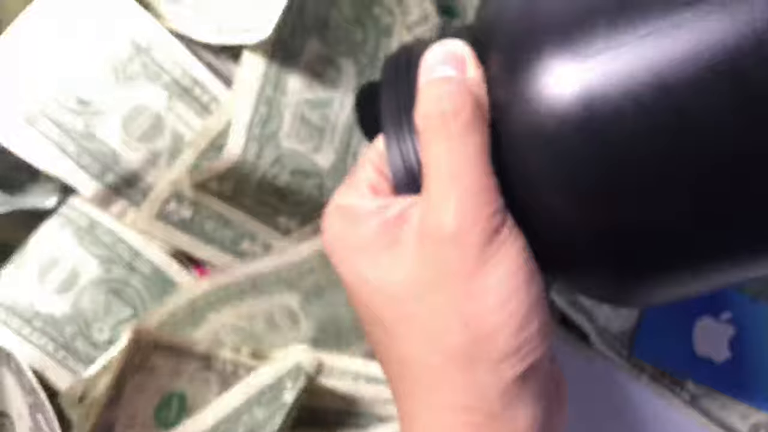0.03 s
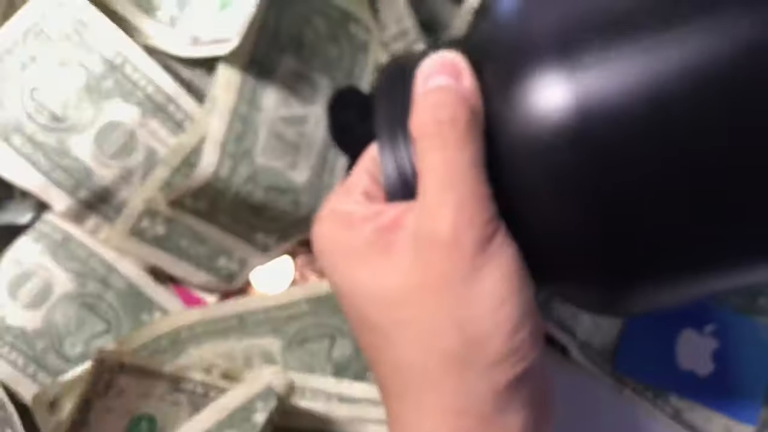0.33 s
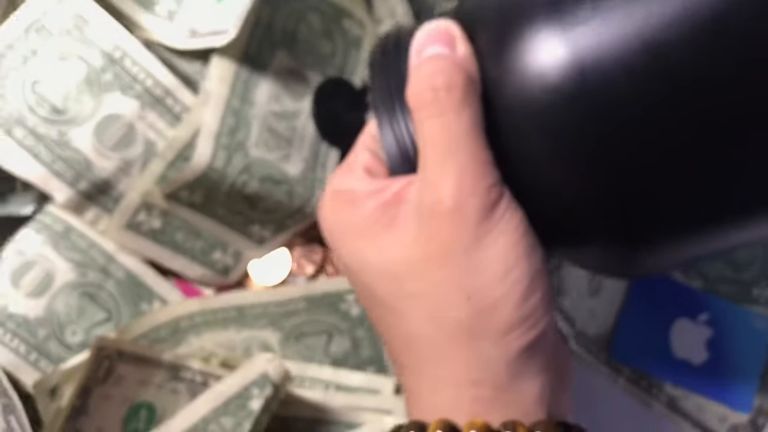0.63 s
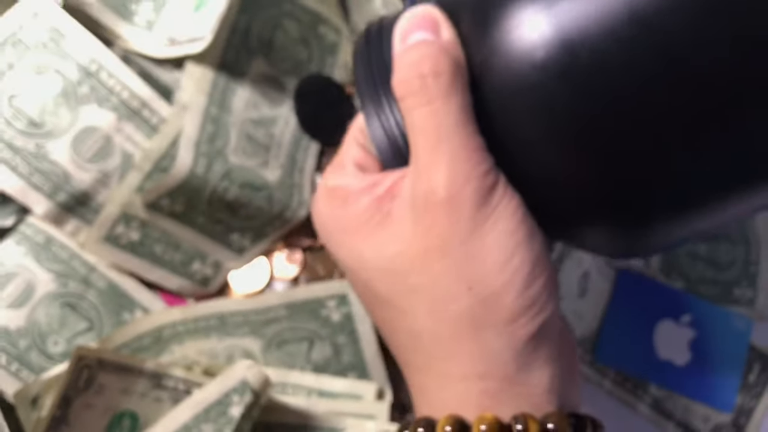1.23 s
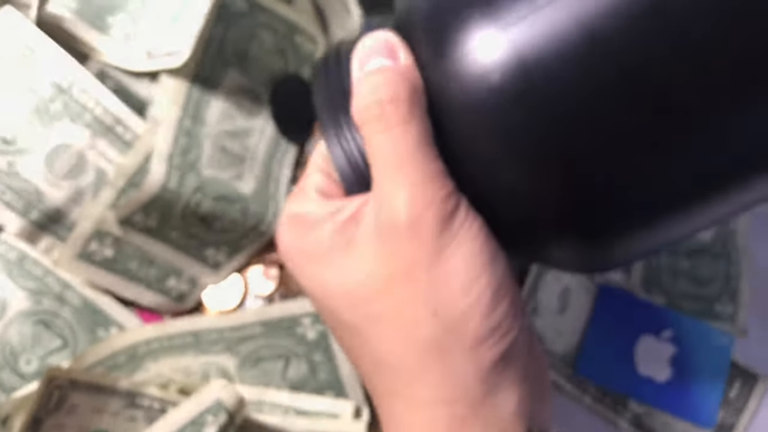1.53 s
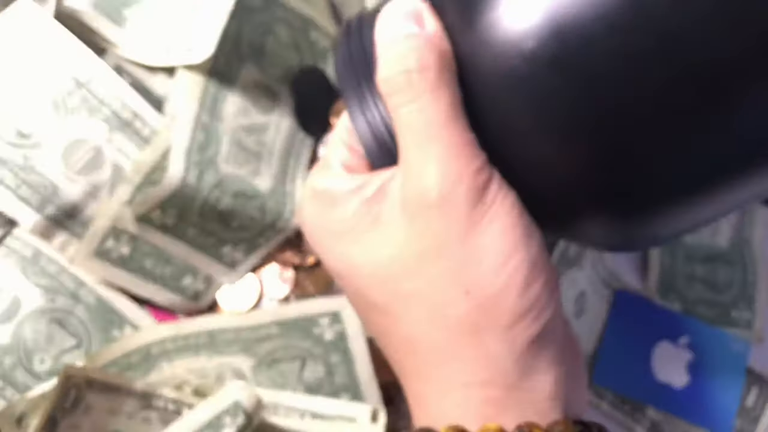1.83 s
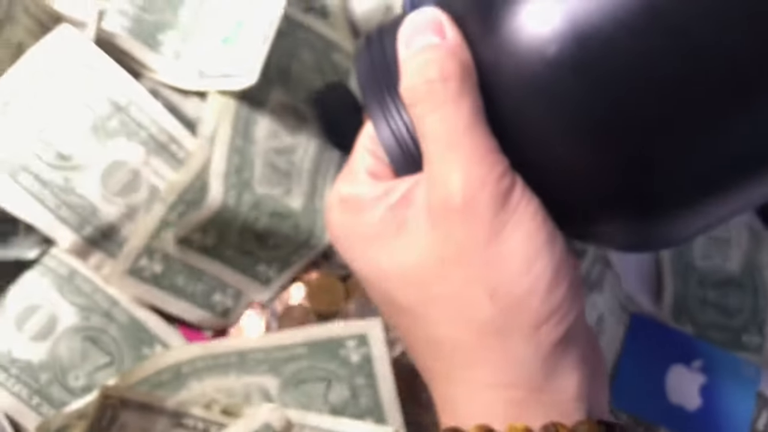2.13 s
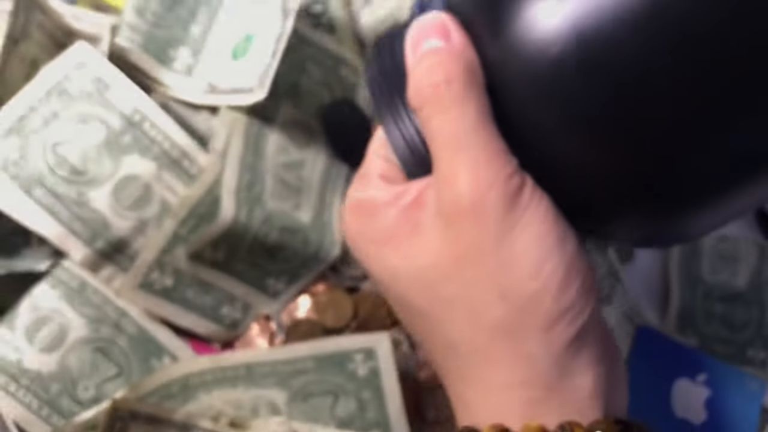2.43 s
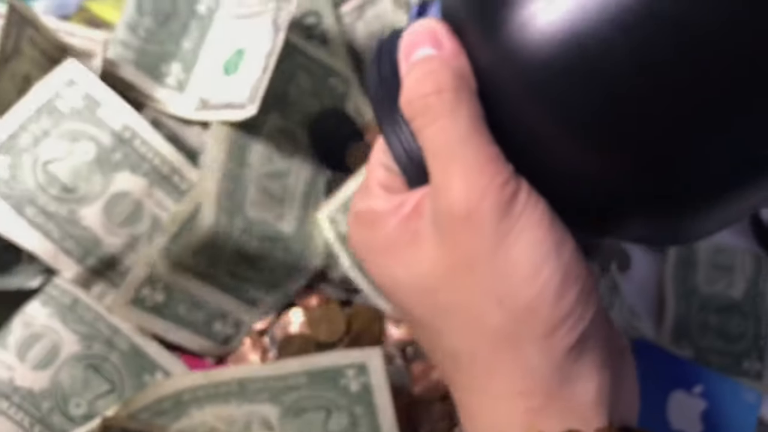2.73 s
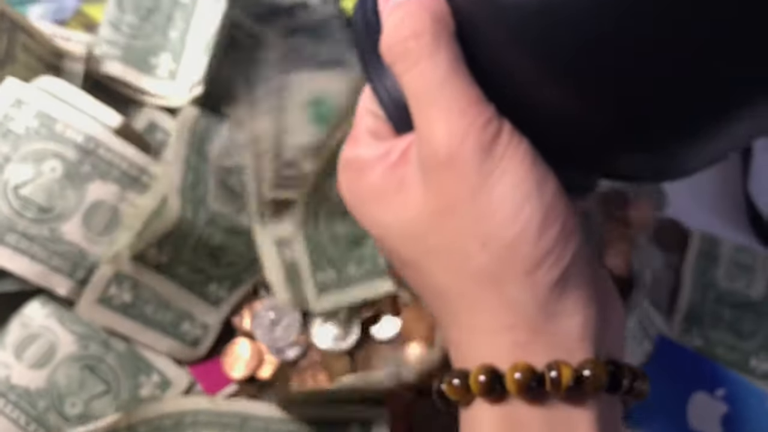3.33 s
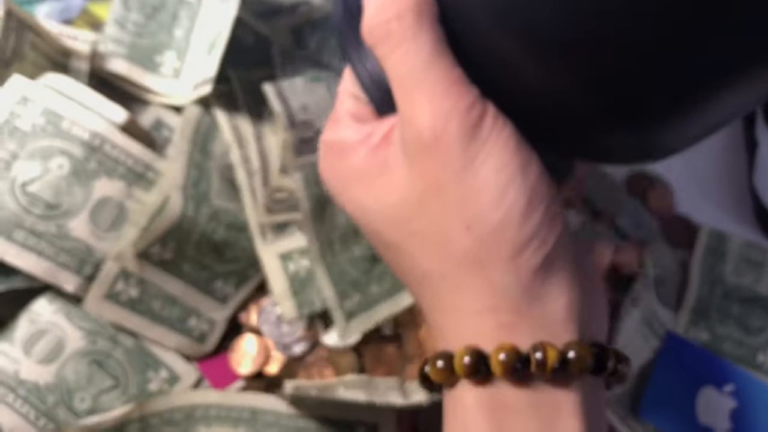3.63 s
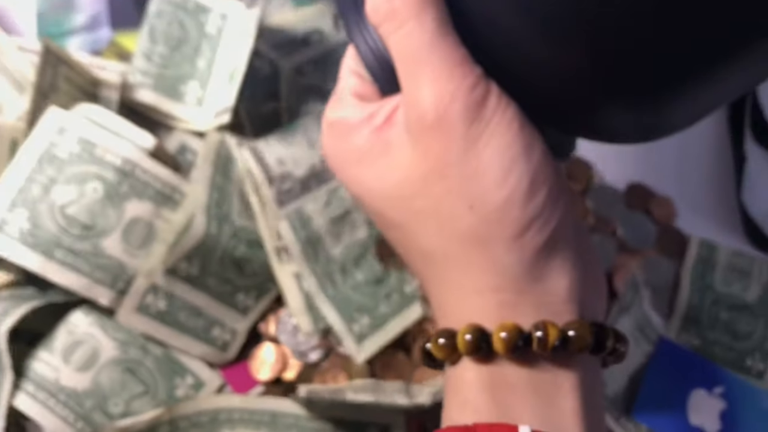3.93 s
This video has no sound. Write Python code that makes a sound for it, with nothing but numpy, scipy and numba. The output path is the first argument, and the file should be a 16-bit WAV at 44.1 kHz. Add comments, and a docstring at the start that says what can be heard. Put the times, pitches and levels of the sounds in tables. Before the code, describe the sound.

Coins pour from a plastic tub onto a heap of coins and bills, jingling and rattling.

```python
"""A hollow boom and a dense bright jingle, close up: coins slide out of a tilted plastic tub onto a heap
of coins and paper bills. Coin strikes coin, ticking and ringing; the shifting load booms in the tub's
hollow and rattles along its wall. Clumps land with dull thuds, hard knocks and clinks stand out, and a few
coins fall clear and sing. A small room adds a short tail and the loudest peaks overload the recorder."""
import sys
import numpy as np
from scipy import signal
from scipy.fft import rfft, irfft
from scipy.io import wavfile
from numba import njit

SR = 44100
rng = np.random.default_rng(int(sys.argv[2]) if len(sys.argv) > 2 else 0)


def write(x):
    x = np.atleast_2d(x).T
    wavfile.write(sys.argv[1], SR, np.round(np.clip(x, -1, 1) * 32767).astype(np.int16))


N = 176400

# Table levels are relative: each layer applies its own trim.
# swell of the tub's hollow boom (time [s], level [dB])
BOOM_ENVELOPE = [(0, -9.5), (.05, -38), (.09, -39), (.14, -27), (.22, -46), (.3, -42), (.5, -32),
                 (.58, -29), (.8, -24.5), (.9, -28), (1.05, -32), (1.24, -22.5), (1.33, -30), (1.5, -27),
                 (1.65, -33.5), (2, -37), (2.1, -42), (2.33, -40), (2.45, -26), (2.58, -26.5),
                 (2.67, -22.5), (2.95, -27.5), (3.2, -24), (3.3, -35), (3.42, -30), (3.5, -44), (3.68, -24),
                 (3.8, -35.5), (4, -37)]
# low modes of the tub (pitch [Hz], level [dB], t60 [s])
HOLLOW_MODES = [(164.3, -2.5, 0.063), (201.6, 2.5, 0.13), (265, -4.5, 0.088), (309, -4, 0.038),
                (423, -15, 0.095)]
# tone of the heap's rumble (frequency [Hz], level [dB])
RUMBLE_EQ = [(20, -9), (60, -6), (120, 1), (250, -2), (600, -22)]
# flow of coins striking each other (time [s], level [dB])
JINGLE_ENVELOPE = [(0.0, -14.5), (0.24, -20), (0.29, -37), (0.32, -25), (0.4, -36.5), (0.52, -20.5),
                   (0.83, -13), (0.87, -10), (0.95, -11.5), (1.15, -14), (1.2, -8.5), (1.35, -13.5),
                   (1.4, -9), (1.46, -19), (1.48, -14), (1.5, -16), (1.64, -20.5), (1.68, -14),
                   (1.73, -14.5), (1.93, -10), (2.17, -17), (2.19, -21.5), (2.33, -23.5), (2.35, -9.5),
                   (2.41, -22.5), (2.65, -6.5), (3.03, -4.5), (3.1, -10.5), (3.21, -5), (3.41, -10.5),
                   (3.52, -20), (3.53, -15.5), (3.55, -20.5), (3.82, -4.5), (3.85, -24), (3.88, -16),
                   (3.92, -24), (3.93, -4.5), (3.95, -24.5), (4.0, -21.5)]
# bending modes of the mixed coins (pitch [Hz], spread between coins [Hz], level [dB])
BENDING_MODES = [(9285, 207, -6.5), (12120, 750, -5), (13040, 234, 0), (14700, 550, -2.5), (15300, 233, -2)]
# tone of a metal-on-metal tick (frequency [Hz], level [dB])
TICK_EQ = [(500, -7), (2500, -20), (4500, -7), (6000, 0.5), (8000, 0), (10500, 2), (16000, 5)]
# coins tumbling along the tub wall (time [s], level [dB])
RATTLE_ENVELOPE = [(0, -24.5), (.1, -30), (.19, -22), (.24, -34), (.33, -30), (.45, -35), (.53, -30.5),
                   (.6, -24), (.64, -18.5), (.68, -24), (.76, -18.5), (.94, -23.5), (.98, -21),
                   (1.1, -21.5), (1.17, -19), (1.4, -20.5), (1.45, -25), (1.54, -21), (1.63, -20.5),
                   (1.7, -17), (1.82, -23.5), (1.95, -33), (1.98, -21), (2.06, -24), (2.12, -28),
                   (2.18, -31), (2.25, -24), (2.31, -25.5), (2.35, -33.5), (2.42, -27.5), (2.48, -15.5),
                   (2.6, -20), (2.65, -15), (2.95, -17), (3.05, -16), (3.28, -17.5), (3.47, -26.5),
                   (3.56, -23), (3.67, -14.5), (3.76, -16.5), (3.84, -27), (3.95, -26.5), (4, -38)]
# resonances of the tub wall (pitch [Hz], width [Hz], level [dB])
PLASTIC_MODES = [(604, 26, 0.5), (1055, 130, -8), (1530, 220, -4), (1886, 170, -9), (2404, 150, -6),
                 (2970, 120, -5), (3350, 240, -3), (4080, 270, -7)]
# tone of the struck wall (frequency [Hz], level [dB])
WALL_EQ = [(100, -39), (300, -1), (480, -15.5), (700, -3.5), (1100, -2.5), (1550, -4.5), (2100, -3),
           (3300, -4), (4200, -6.5), (5000, -6.5), (7500, -9.5), (16000, -26.5)]
# clumps of coins landing (time [s], level [dB], slap offset [dB])
THUD_CUES = [(0.014, -22, -14), (.138, -10.5, -13), (.15, -16, -19), (.639, -12, -2), (.777, -25, -7),
             (.98, -9, -7.5), (1.096, -14, 2), (1.216, -14, -12), (1.482, -20, -6), (1.714, -13, 3),
             (1.988, -14, -3), (2.235, -17, 0), (2.292, -17, 0), (2.355, -22, -12), (2.43, -16, -6),
             (2.649, 0.5, 1), (2.775, -2, 2.5), (2.883, -0.5, 1), (2.998, -6, -5), (3.09, -7, -9),
             (3.184, -5, 7), (3.254, -11, 3), (3.395, -8, 1.5), (3.659, -20, -4), (3.875, -14, -2),
             (3.961, -10, 4.5)]
# tone of a clump's slap (frequency [Hz], level [dB])
SLAP_EQ = [(60, -32), (150, -15), (450, -12), (750, -5), (1100, 0), (1700, -8), (4000, -22)]
# single hard knocks on the wall (time [s], level [dB], clack pitch [Hz])
KNOCK_CUES = [(0.143, -8, 3780), (0.163, -0.5, 2130), (0.174, -9, 2140), (0.192, -10, 1830),
              (0.212, -12, 2160), (0.285, -13, 1660), (0.333, -13, 1610), (0.366, -13.5, 3090),
              (0.39, -15, 3000), (0.422, -15, 1480), (0.476, -17.5, 3200), (0.548, -13.5, 1430),
              (0.624, 2.5, 3300), (0.644, -4, 3230), (0.69, -3.5, 2480), (0.717, -7.5, 2220),
              (0.737, -11, 2390), (1.06, -10.5, 1540), (1.222, -4.5, 1520), (1.255, -6.5, 1460),
              (1.378, -4.5, 1490), (1.401, -1.5, 1570), (1.526, -0.5, 3570), (1.582, -4, 1440),
              (1.69, 0, 1600), (1.699, -3, 1420), (1.787, -3.5, 4050), (1.981, -4.5, 2960),
              (2.022, -6.5, 2940), (2.234, -3, 1520), (2.291, 2.5, 2410), (2.379, -8, 2260),
              (2.395, -4, 1800), (2.428, -7, 2370), (2.457, -3.5, 2900), (2.463, -2, 3930),
              (2.501, 1.5, 2250), (2.622, -5, 2410), (2.63, -0.5, 2040), (2.644, -2, 1450),
              (2.691, -5, 2400), (2.772, -1, 1660), (2.995, -3, 1760), (3.185, -2.5, 1950),
              (3.502, -6.5, 1570), (3.583, -3, 1550), (3.662, -2.5, 2960), (3.686, -10.5, 2400),
              (3.694, -6, 2520), (3.715, -6, 3820), (3.865, -7, 1650), (3.889, -12.5, 2480),
              (3.928, -8.5, 3190)]
# hard coin-on-coin strikes (time [s], level [dB])
CLINK_CUES = [(.1635, -21), (.2453, -11), (.3125, -11), (.423, -13), (.5574, -8), (.6234, -2), (.8605, 1),
              (.8913, -1), (1.1942, -3), (1.398, -3), (1.479, 4), (1.6676, -9), (2.075, -4), (2.1594, -5),
              (2.2333, -2.5), (2.2987, -2), (2.3267, -6), (2.3441, -9), (2.36, -8), (2.4557, -3),
              (2.5453, -10), (3.34, -6), (3.528, -4), (3.6257, -1), (3.7894, -1), (3.8133, -2),
              (3.867, -13), (3.879, -6), (3.932, 3)]
# coins that fall clear and ring freely (time [s], level [dB], pitch [Hz], t60 [s])
FREE_COIN_CUES = [(1.479, -8, 15400, .12), (1.55, -18, 11600, .1), (1.668, -11, 15200, .1),
                  (1.92, -18, 11560, .18), (2.075, -13, 9200, .1), (2.235, -16, 11600, .1),
                  (2.298, -13, 14680, .26), (2.33, -9, 12170, .22), (2.368, -17, 9540, .3),
                  (2.842, -13, 5160, .06), (2.933, -10, 5220, .09), (3.035, -11, 5200, .08),
                  (3.04, -13, 4060, .08), (3.68, -8, 14930, .25), (3.72, -11, 14930, .25),
                  (3.79, -5, 14930, .13), (3.82, -4, 14930, .07), (3.868, -8, 12700, .1),
                  (3.895, -10, 12780, .08)]

CLACK_T60_S = 0.038


def amp(db):
    """Decibels to gain."""
    return 10 ** (np.asarray(db) / 20)


def unit(x):
    """Scale to rms 1."""
    return x / np.sqrt(np.mean(x ** 2))


def fader(rows):
    """Gain at every sample from rows of (time [s], level [dB])."""
    return amp(np.interp(np.arange(N) / SR, *np.array(rows).T))


def decay(t60):
    """Exponential fade that falls 60 dB in t60 seconds."""
    return np.exp(-np.log(1000) * np.arange(int(t60 * SR) + 2) / (t60 * SR))


def convolve(x, response):
    """Pass a sound through an impulse response."""
    return signal.fftconvolve(x, response)[:N]


def eq(x, points, size=2048):
    """Minimum-phase filter of unit power, shaped by points of (frequency [Hz], level [dB])."""
    hz, db = np.array(points).T
    bin_hz = np.arange(size // 2 + 1) * SR / size
    gain = unit(amp(np.interp(np.log(bin_hz + 1), np.log(hz), db)))
    cepstrum = irfft(np.log(gain))
    cepstrum[1:size // 2] *= 2
    cepstrum[size // 2 + 1:] = 0
    return convolve(x, irfft(np.exp(rfft(cepstrum))))


def contacts(per_s, scatter_db):
    """Irregular contact times and their strengths, which span up to four times scatter_db."""
    chance = rng.random((int(per_s * N / SR), 3))
    times = (np.arange(len(chance)) + 2 * chance[:, 0]) / per_s
    return times, amp(2 * scatter_db * (chance[:, 1] + chance[:, 2]))


def cracks(times, sizes, t60):
    """A short decaying burst of noise at each contact."""
    power = np.bincount((times * SR).astype(int), sizes ** 2, N)[:N]
    envelope = np.sqrt(np.abs(convolve(power, decay(t60) ** 2)))
    return envelope * rng.standard_normal(N)


@njit
def rings(times, hz, t60, sizes):
    """A decaying sine at each contact; hz and t60 are shared or given per contact."""
    out = np.zeros(N)
    hz, t60 = hz * np.ones(len(times)), t60 * np.ones(len(times))
    for k in range(len(times)):
        start, phasor = int(times[k] * SR), sizes[k] + 0j
        pole = np.exp((2j * np.pi * hz[k] - np.log(1000) / t60[k]) / SR)
        for i in range(max(start, 0), min(N, start + int(t60[k] * SR))):
            phasor *= pole
            out[i] += phasor.imag
    return out


def tub_ring(times, sizes, low_cut_hz=137):
    """Each push rings the tub's low modes, in alternating polarity; the deep bass below them is cut away."""
    ring = sum((-1) ** k * rings(times, hz, t60, sizes * amp(db))
               for k, (hz, db, t60) in enumerate(HOLLOW_MODES))
    return signal.sosfilt(signal.butter(3, low_cut_hz, "high", fs=SR, output="sos"), ring)


def tub_boom():
    """The shifting load keeps the hollow booming over the heap's faint rumble."""
    times, sizes = contacts(per_s=300, scatter_db=0.5)
    boom = unit(tub_ring(times, sizes * rng.standard_normal(len(times))))
    rumble = eq(rng.standard_normal(N), RUMBLE_EQ)
    return fader(BOOM_ENVELOPE) * (amp(-0.5) * boom + amp(-10.5) * rumble)


def clump_flutter(per_s=55, depth_db=1.3):
    """Coins slip in small clumps, so the flow flutters in level."""
    times = np.arange(int(per_s * N / SR) + 2) / per_s
    return unit(fader(np.c_[times, depth_db * rng.standard_normal(len(times))]))


def jingle():
    """Coin on coin: a tick, then modes that ring until the neighbours damp them."""
    times, sizes = contacts(per_s=1200, scatter_db=5)
    t60 = 0.029 * np.exp(0.55 * rng.standard_normal(len(times)))
    ring = np.zeros(N)
    for hz, spread, db in BENDING_MODES:
        detune, share = rng.standard_normal((len(times), 2)).T
        ring += rings(times, hz + spread * detune, t60, sizes * share * amp(db))
    ticks = eq(cracks(times, sizes, t60=0.022), TICK_EQ)
    return fader(JINGLE_ENVELOPE) * clump_flutter() * (amp(-2.5) * unit(ring) + amp(-6) * unit(ticks))


def plastic_wall(x):
    """The wall dulls a hit and adds its own resonances."""
    dull = eq(x, WALL_EQ)
    return dull + sum(amp(db) * signal.lfilter(*signal.iirpeak(hz, hz / width, SR), dull)
                      for hz, width, db in PLASTIC_MODES)


def wall_rattle(pitch_spread=0.07):
    """Coins tumble along the wall: a scrape, and clacks whose pitch changes from spot to spot."""
    times, sizes = contacts(per_s=260, scatter_db=3.5)
    clacks = np.zeros(N)
    for hz, width, db in PLASTIC_MODES:
        detune, share = rng.standard_normal((len(times), 2)).T
        pitch = hz * (1 + pitch_spread * detune)
        clacks += rings(times, pitch, CLACK_T60_S, sizes * share * amp(db) * np.sqrt(width))
    scrape = plastic_wall(unit(cracks(times, sizes, t60=0.035)))
    return fader(RATTLE_ENVELOPE) * (amp(-2) * scrape + amp(-3) * unit(clacks))


def thuds():
    """A clump lands with a dull slap and shakes the tub."""
    times, db, slap_db = np.array(THUD_CUES).T
    slap = eq(cracks(times, amp(db + slap_db - 7), t60=0.039), SLAP_EQ)
    body = tub_ring(times, amp(db - 2.5) / 2)
    return slap + body


def knocks():
    """A coin hits the wall hard, clacks and chatters as it bounces on."""
    times, db, hz = np.array(KNOCK_CUES).T
    attack = cracks(times, amp(db - 5), t60=0.024)
    chatter = cracks(times, amp(db - 18.5), t60=0.06)
    clack = rings(times, hz, CLACK_T60_S, amp(db - 9))
    return plastic_wall(attack + chatter) + clack


def clinks(ring_t60_s=0.059):
    """A hard strike ticks and sets the modes of both coins ringing."""
    times, db = np.array(CLINK_CUES).T
    ticks = eq(cracks(times, amp(db - 8), t60=0.045), TICK_EQ)
    times, db = np.repeat(times, 2), np.repeat(db, 2)  # two coins per strike
    ring = np.zeros(N)
    for hz, spread, mode_db in BENDING_MODES:
        pitch = hz + spread * rng.standard_normal(len(times))
        ring += rings(times, pitch, ring_t60_s, amp(db + mode_db - 9) / 2)
    return ticks + ring


def free_coins():
    """A few coins fall clear and sing on, each on one high pitch."""
    times, db, hz, t60 = np.array(FREE_COIN_CUES).T
    return rings(times, hz, t60, amp(db))


def room_tail(x, t60):
    """Dense reflections of a small room: a dying noise tail of unit energy."""
    envelope = decay(t60)
    tail = envelope * rng.standard_normal(len(envelope))
    return convolve(x, tail / np.sqrt(np.sum(tail ** 2)))


def scene():
    """The whole pour in mono, with a touch of room."""
    pour = tub_boom() + jingle() + wall_rattle() + thuds() + knocks() + clinks() + free_coins()
    return (pour + amp(-13) * room_tail(pour, t60=0.16))[None]


def record(dry):
    """The recorder rounds off peaks near full scale and cuts the top."""
    knee, high_cut_hz = 5, 15900
    clipped = dry / (1 + np.abs(dry) ** knee) ** (1 / knee)
    return signal.sosfilt(signal.ellip(12, .1, 70, high_cut_hz, fs=SR, output="sos"), clipped)


dry = scene()
out = record(dry)
write(out)
```